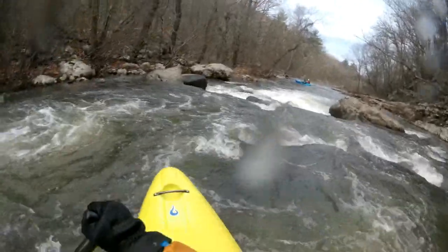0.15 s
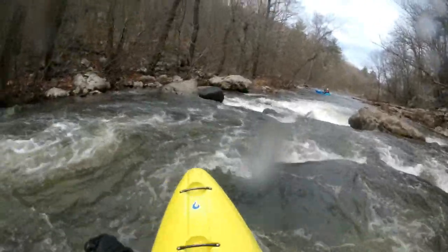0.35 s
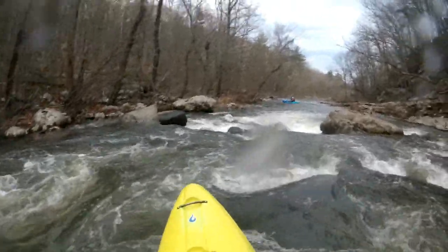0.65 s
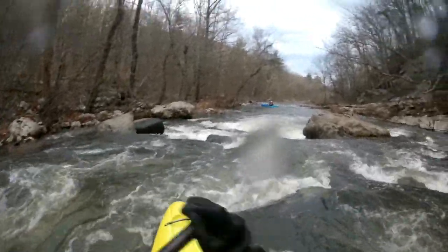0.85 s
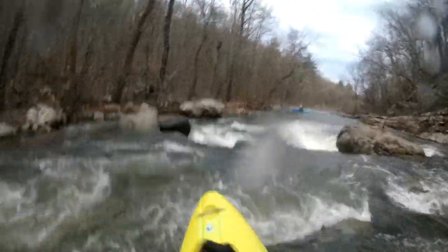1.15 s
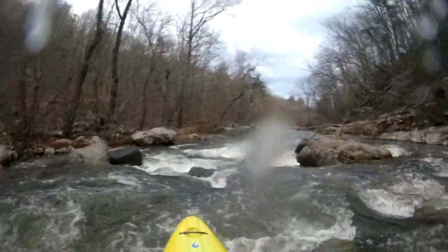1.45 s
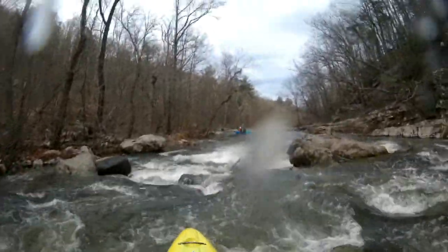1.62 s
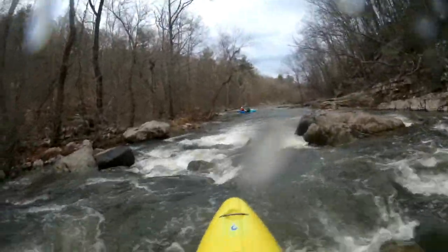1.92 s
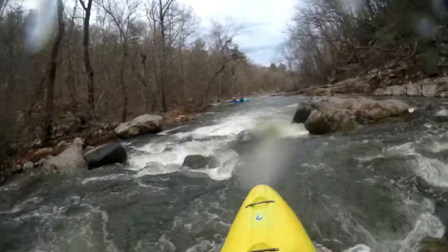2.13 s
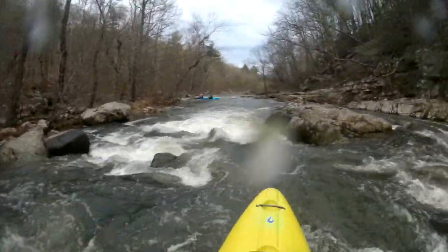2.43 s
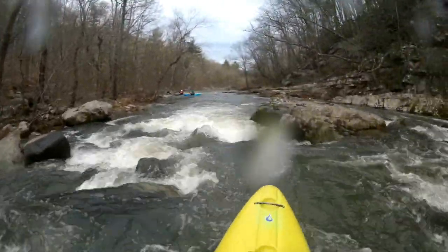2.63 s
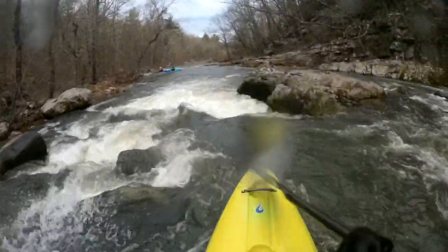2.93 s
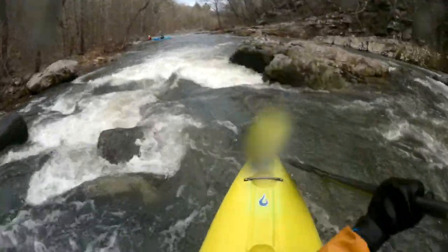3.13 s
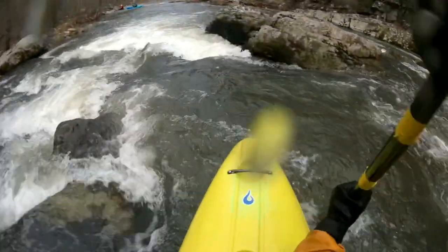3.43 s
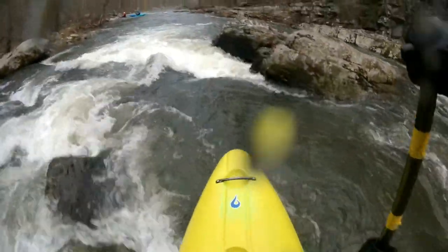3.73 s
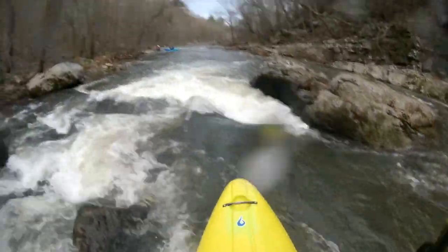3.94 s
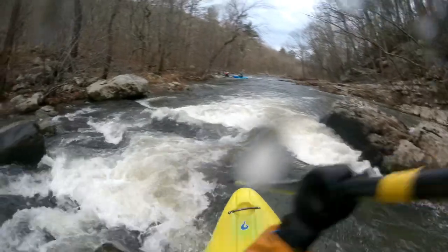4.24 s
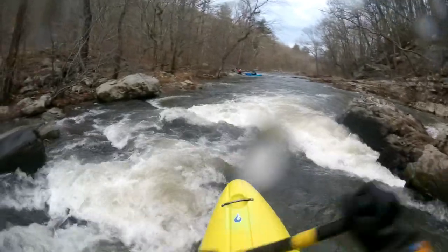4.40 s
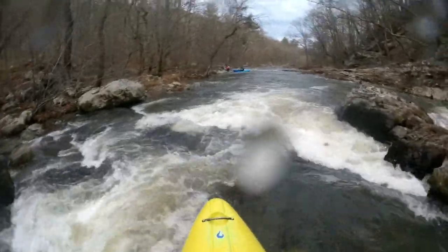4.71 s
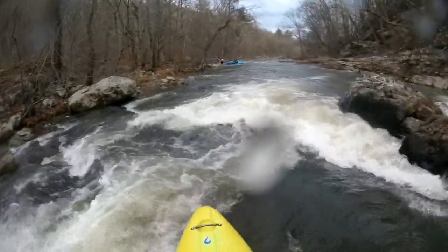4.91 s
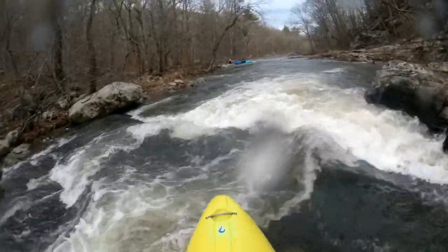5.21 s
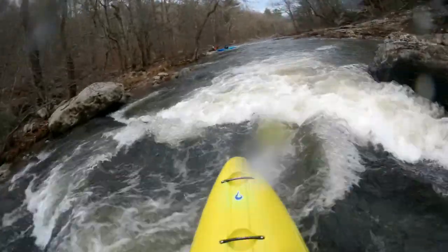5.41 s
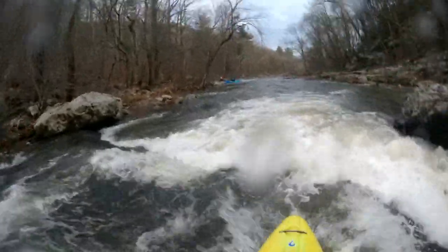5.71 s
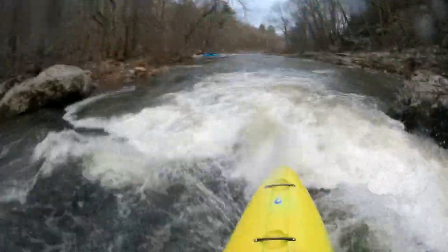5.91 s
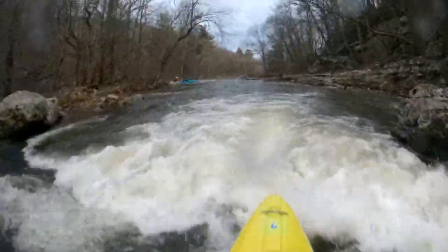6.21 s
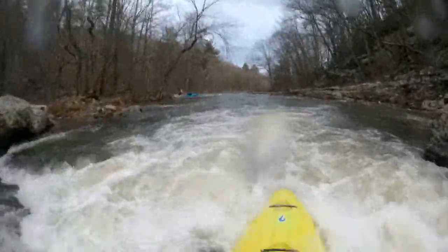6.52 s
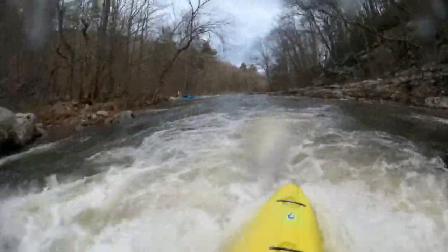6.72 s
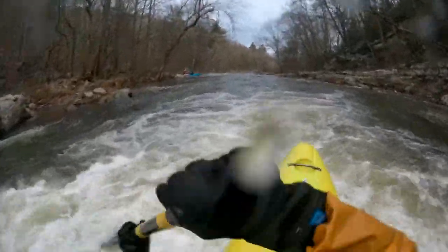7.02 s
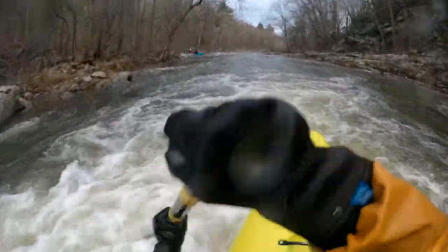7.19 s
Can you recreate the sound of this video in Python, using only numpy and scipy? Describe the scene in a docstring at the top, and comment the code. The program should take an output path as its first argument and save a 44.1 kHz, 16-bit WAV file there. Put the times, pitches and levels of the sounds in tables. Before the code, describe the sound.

Whitewater rushes and fizzes around a kayak, with spray ticking on the microphone, low wind buffeting and a paddle knock.

```python
"""A kayak runs a rocky rapid, heard from a waterproof camera worn by the paddler. Whitewater roars and fizzes
throughout; waves drive air against the microphone, the hull thumps and water gulps. Spray drops tick on the
resonant housing, thickest at 1-2 s. At 3 s the paddle knocks the hull; at 4 s a small pour-over slides past.
Wet slaps follow near 4.5 and 6 s, with more spray, as the rapid swells to its peak at 6.5 s and then recedes."""
import sys
import numpy as np
from scipy import signal
from scipy.fft import rfft, irfft, next_fast_len
from scipy.io import wavfile
from scipy.ndimage import uniform_filter1d, map_coordinates

SR = 44100
rng = np.random.default_rng(int(sys.argv[2]) if len(sys.argv) > 2 else 0)


def bounce(signal):
    """Save signal as a 16-bit WAV file at the path given by the first command-line argument."""
    frames = np.transpose(np.atleast_2d(signal))
    limited = np.clip(frames, -1, 1)
    pcm = np.round(limited * 32767).astype(np.int16)
    wavfile.write(sys.argv[1], SR, pcm)


N = 324135

# waves under the boat: (time [s], hold [s], strength [dB])
WAVE_EVENTS = [(.26, .1, -10), (.62, .06, -12), (1.039, .29, -1), (1.656, .2, -8), (3.043, .2, -14),
               (4.52, 0.16, -12), (5.814, .22, -8), (6.29, .22, -6), (6.9, .13, -13)]
# whitewater loudness contour: (time [s], level [dB])
RAPID_CONTOUR = [(0, -62), (.85, -64), (2.1, -63), (3.9, -59), (4.3, -59), (4.65, -57), (5.3, -58.5),
                 (6.45, -53), (6.95, -54.5), (7.35, -60.5)]
# hiss from froth right around the boat: (time [s], power share [0-1])
FROTH_SHARE = [(0, 0.68), (3.5, 0.03), (5.2, 0.75), (6.5, 0.76), (7.35, 0.97)]

# noise spectra: (frequency [Hz], relative density [dB])
AIR_SPECTRUM = [(1, 11.5), (5, 8), (11, 13.5), (20, 3.5), (30, -4.5), (45, -9), (65, -21.5), (130, -36),
                (400, -48), (1500, -100)]  # air on the microphone
POUR_SPECTRUM = [(5500, -25), (7200, -6), (8400, 1), (9300, -4), (10600, -1.5), (11800, -13), (16000, -24)]  # pour-over fizz
ROAR_SPECTRUM = [(600, -31), (900, -18.5), (1020, -6), (1110, -1.5), (1200, 1), (1300, -3.5), (1430, -8.5),
                 (1600, -6), (1700, -9), (1830, -8), (2050, -13.5), (2500, -21), (3100, -31.5), (4500, -45)]  # bubble clouds
FOAM_SPECTRUM = [(2200, -30), (2950, -11.5), (3400, -2.5), (3750, -3), (4000, 1), (4350, -3), (4900, -9),
                 (5800, -10), (6500, -17.5), (9000, -29.5)]  # foam ahead, at the housing's resonance
FROTH_SPECTRUM = [(2200, -21), (2950, -9.5), (3550, 0.5), (4300, -2), (4900, -2.5), (6000, -5.5),
                  (6700, -14), (9000, -31)]  # broader hiss all around
MIST_SPECTRUM = [(5000, -30), (6500, -2), (7700, -0.5), (8500, 1), (9300, -2), (10400, -3), (12000, -8),
                 (13700, -9), (15400, -17), (16500, -12)]  # finest spray
CHURN_SPECTRUM = [(35, -13), (44, 2.5), (62, 0.5), (78, 4.5), (92, 5.5), (112, 0.5), (200, -2), (300, -3),
                  (600, -4), (850, -4), (1200, -17), (2500, -50)]  # deep water motion
SMACK_SPECTRUM = [(100, -13), (400, -0.5), (900, -1.5), (2000, -1), (2700, -10), (3500, 3), (5000, -0.5),
                  (9000, -27)]  # drop contact
SPATTER_SPECTRUM = [(1500, -28), (2700, -14), (3500, -0.5), (5500, 5), (7000, -1.5), (9500, -2.5),
                    (11000, -4), (11900, -8.5), (12600, -10), (13800, -23), (15200, -14), (17000, -20)]  # drop fragments
SPLASH_SPECTRUM = [(800, -18), (1700, 7), (2300, 4), (2900, -4.5), (4200, 2.5), (6500, -11.5),
                   (10500, -12.5), (15000, -34)]  # larger mass of water breaking

# damped modes: (frequency [Hz], level [dB], t60 [s])
SHELL_MODES = [(1200, -29, 0.037), (1540, -18.5, 0.023), (1860, -33, 0.019), (3480, -9.5, 0.0045),
               (4044, -0.5, 0.0078), (4494, -6, 0.0074), (6030, -22, 0.011)]  # housing under a drop
KNOCK_MODES = [(734, -12.5, 0.033), (1165, -13.5, 0.048), (1330, 0, 0.018), (1450, -0.5, .015),
               (1820, 2.5, .016), (2220, -17, 0.0092)]  # housing under a blow to the boat
HULL_MODES = [(170, -4.5, 0.085), (219, 1, 0.053), (384, -8, 0.055)]  # hollow hull

# low rings, hull thumps (near 1.0, 3.2 and 5.9 s) and air pockets closing: (time [s], level [dB], start pitch
# [Hz], t60 [s])
LOW_RINGS = [(.69, -37.5, 99, 0.23), (1.0, -26.5, 51.6, 0.2), (3.078, -41, 504, 0.13),
             (3.2, -34.5, 90.5, 0.31), (5.901, -30, 51.5, .25), (6.467, -18.5, 1140, 0.028),
             (6.474, -26.5, 1290, 0.053)]
# spray sheets on the housing: (time [s], level [dB], rise [s])
SPRAY_SHEETS = [(1.064, -46, 0.0028), (1.106, -48, 0.0011), (1.129, -39, 0.0022), (1.1886, -47, 0.0023),
                (1.402, -41, 0.0025), (1.742, -52, 0.0024), (3.324, -54.5, 0.005), (5.742, -53, 0.0035),
                (5.976, -47.5, 0.0027), (6.322, -44.5, 0.0032), (6.593, -49.5, 0.0032),
                (6.918, -53.5, .003)]
# drops on the housing: (time [s], impact [dB], spatter [dB])
DROP_HITS = [(0.2806, -33.5, -51), (0.3673, -22.5, -52), (0.47, -41, -53), (0.6094, -25, -40.5),
             (1.074, -25, -31), (1.0992, -21.5, -42), (1.1341, -11.5, -39), (1.189, -28, -41),
             (1.264, -17, -38), (1.3329, -12.5, -38), (1.3717, -25, -66), (1.4101, -21.5, -34),
             (1.5517, -29.5, -53), (1.6505, -22, -49), (1.6923, -24.5, -59), (1.7759, -26, -53),
             (1.843, -38, -48), (1.8628, -35.5, -54), (1.976, -52, -55), (2.6634, -36.5, -59),
             (4.0844, -25, -57), (4.2271, -27, -54), (4.663, -26.5, -47), (4.6964, -30, -39),
             (4.7012, -23, -30), (4.7633, -28, -45), (5.7757, -35, -63), (5.828, -27.5, -56),
             (6.0104, -32, -47), (6.0945, -20, -29), (6.18, -33, -46), (6.219, -27, -60),
             (6.2931, -27.5, -51), (6.3793, -17, -45), (6.429, -29.5, -42), (6.701, -33, -53),
             (7.006, -27.5, -45)]
# paddle and wave blows: (time [s], level [dB], boom offset [dB], splash offset [dB])
BOAT_BLOWS = [(3.0099, -11, -13, -29), (3.0161, -25.5, -21, -39), (3.070, -31, -10, -33),
              (4.5435, -25, -30, -1.5), (4.55, -24.5, -34, -17), (5.977, -32, -2, -17),
              (6.012, -26.5, -16, -11.5)]


def amp(db):
    """Decibels to amplitude."""
    return 10 ** (np.asarray(db) / 20)


def unit(x):
    """Scale to rms 1."""
    return x / np.sqrt(np.mean(x ** 2) + 1e-20)


def gain_at(spectrum, hz):
    """Spectrum amplitude, interpolated over log frequency."""
    knots_hz, db = np.transpose(spectrum)
    return amp(np.interp(np.log(hz + 1e-3), np.log(knots_hz), db))


def curve(points):
    """(time [s], value) points to one value per sample."""
    return np.interp(np.arange(N) / SR, *np.transpose(points))


def wobble(rate_hz):
    """Smooth random curve with knots at rate_hz."""
    knots = rng.standard_normal(int(N * rate_hz / SR) + 4)
    return map_coordinates(knots, [np.arange(N) * rate_hz / SR])


def filtered(x, response):
    """Apply a gain given as a function of frequency."""
    size = next_fast_len(N + SR // 2)
    return irfft(rfft(x, size) * response(np.fft.rfftfreq(size, 1 / SR)), size)[:N]


def impulse(spectrum, size=2048):
    """Minimum-phase click of energy 1 with this spectrum."""
    cepstrum = irfft(np.log(gain_at(spectrum, np.fft.rfftfreq(size, 1 / SR))))
    cepstrum[1:size // 2] *= 2
    cepstrum[size // 2 + 1:] = 0
    click = irfft(np.exp(rfft(cepstrum)))
    return click / np.linalg.norm(click)


def add(track, at_s, sound):
    """Mix a sound into the track."""
    part = track[round(at_s * SR):][:len(sound)]
    part += sound[:len(part)]


def ring(modes, t, scatter_db, detune):
    """Damped modes, varied per strike."""
    draws = rng.standard_normal((len(modes), 2))
    return sum(amp(db + scatter_db * level_draw - 60 * t / t60_s)
               * np.sin(2 * np.pi * hz * (1 + detune * pitch_draw) * t)
               for (hz, db, t60_s), (level_draw, pitch_draw) in zip(modes, draws))


def rush(spectrum, patchy_db, pops=0, pops_per_s=300):
    """Patchy noise of rms 1; pops weights single bursting bubbles."""
    bins = signal.stft(rng.standard_normal(N), nperseg=512)[2]
    patches = uniform_filter1d(rng.standard_normal(bins.shape), size=5, axis=0)
    patches = uniform_filter1d(patches, size=10, axis=1)
    wash = signal.istft(bins * amp(patchy_db * unit(patches)), nperseg=512)[1][:N]
    bursts = (rng.random(N) < pops_per_s / SR) * rng.standard_normal(N)
    return unit(filtered(unit(wash) + pops * unit(bursts), lambda hz: gain_at(spectrum, hz)))


def wave_force(attack_s=0.06, release_s=0.076):
    """Each wave builds, holds and lets go of the boat."""
    t = np.arange(N) / SR
    force = np.zeros(N)
    for at_s, hold_s, db in WAVE_EVENTS:
        before_s, after_s = np.maximum(at_s - t, 0), np.maximum(t - at_s - hold_s, 0)
        force += amp(db) * np.exp(-before_s / attack_s - after_s / release_s)
    return force


def buffeting(breeze_db=-39.5, wave_db=-23):
    """Air pushes on the microphone in deep lumps, hardest when a wave throws the boat."""
    return np.hypot(amp(breeze_db), amp(wave_db) * wave_force()) * rush(AIR_SPECTRUM, patchy_db=1.0)


def pour_over(closest_s=4, pass_s=0.5, closest_db=-70.5):
    """Fine spray of a passing pour-over, falling as 1 / distance."""
    distance = np.hypot(1, (np.arange(N) / SR - closest_s) / pass_s)
    level = amp(closest_db + 0.8 * wobble(6.9)) / distance
    return level * rush(POUR_SPECTRUM, patchy_db=0, pops=0.25, pops_per_s=550)


def whitewater():
    """Bubble clouds roar, foam hisses, mist fizzes; all follow the rapid. Waves stir roar and churn."""
    rapid_db = curve(RAPID_CONTOUR)
    rise_db = rapid_db - rapid_db.mean()
    froth_share = curve(FROTH_SHARE)
    swell, force = wobble(9), wave_force()

    roar_level = np.hypot(amp(-47 + 0.64 * rise_db), amp(-50) * force) * amp(0.5 * swell)
    roar = roar_level * rush(ROAR_SPECTRUM, patchy_db=1.34, pops=0.32, pops_per_s=250)

    foam = np.sqrt(1 - froth_share) * rush(FOAM_SPECTRUM, patchy_db=2.3, pops=0.17, pops_per_s=400)
    froth = np.sqrt(froth_share) * rush(FROTH_SPECTRUM, patchy_db=2.5, pops=0.32, pops_per_s=400)
    hiss = amp(-59.5 + 1.01 * rise_db + 0.44 * swell) * (foam + froth)

    mist_level = amp(-70.5 + 1.1 * rise_db + 0.56 * swell)
    mist = mist_level * rush(MIST_SPECTRUM, patchy_db=2.5, pops=0.3, pops_per_s=600)

    churn_level = np.hypot(amp(-53.5 + 0.64 * rise_db), amp(-49) * force) * amp(0.81 * wobble(12))
    churn = churn_level * rush(CHURN_SPECTRUM, patchy_db=1.5)
    return roar + hiss + mist + churn


def thumps_and_gulps():
    """Hull thumps and trapped air pockets ring with a soft start and slightly rising pitch."""
    out, t = np.zeros(N), np.arange(SR // 3) / SR
    for at_s, db, hz, t60_s in LOW_RINGS:
        cycles = hz * t * (1 + 0.043 * t / t60_s)
        envelope = amp(db - 60 * t / t60_s) * (1 - np.exp(-cycles))
        add(out, at_s, envelope * np.sin(2 * np.pi * cycles))
    return out


def sprays():
    """Sheets of droplets crest on the housing within milliseconds, then drain."""
    out, t = np.zeros(N), np.arange(SR // 10) / SR
    spatter_ir, splash_ir = impulse(SPATTER_SPECTRUM), impulse(SPLASH_SPECTRUM)
    for at_s, db, rise_s in SPRAY_SHEETS:
        envelope = t / rise_s * np.exp(1 - t / rise_s)
        fine, coarse = rng.laplace(size=(2, len(t))) * envelope
        add(out, at_s, amp(db - 4.5) * signal.fftconvolve(fine, spatter_ir))
        add(out, at_s, amp(db) * signal.fftconvolve(coarse, splash_ir))
    return out


def stray_drops(count=7, flight_s=0.46, impact_db=-47, spatter_db=-53.5, spread_db=2):
    """Faint drops thrown up by the waves; rows as in DROP_HITS."""
    thrown = np.cumsum(wave_force())
    quantiles = (np.arange(count) + rng.random(count)) / count
    launch_s = np.searchsorted(thrown / thrown[-1], quantiles) / SR
    size_db = spread_db * rng.standard_normal(count)
    return [(at_s + flight_s, impact_db + db, spatter_db + db) for at_s, db in zip(launch_s, size_db)]


def drops(flatten_s=0.00041, contact_t60_s=0.0089, burst_t60_s=0.0053, clump_t60_s=0.028):
    """Each drop smacks and rings the housing, then bursts; fragments land in clumps."""
    out, t = np.zeros(N), np.arange(SR // 20) / SR
    smack_ir, spatter_ir = impulse(SMACK_SPECTRUM), impulse(SPATTER_SPECTRUM)
    for at_s, impact_db, spatter_db in DROP_HITS + stray_drops():
        onset = 1 - np.exp(-(t / flatten_s) ** 2)
        shell = ring(SHELL_MODES, t, scatter_db=0, detune=0.029) * onset
        contact = rng.standard_normal(len(t)) * amp(-60 * t / contact_t60_s)
        flutter = unit(uniform_filter1d(rng.standard_normal(len(t)), size=64))
        clumps = amp(7.4 * np.minimum(flutter, 1.8) - 13 - 60 * t / clump_t60_s)
        spatter = rng.standard_normal(len(t)) * (amp(-60 * t / burst_t60_s) + clumps)
        add(out, at_s + 0.001106, amp(impact_db + 5.5) * shell)
        add(out, at_s + 0.001108, amp(impact_db - 8.5) * signal.fftconvolve(contact, smack_ir))
        add(out, at_s + 0.0009, amp(spatter_db + 4.5) * signal.fftconvolve(spatter, spatter_ir))
    return out


def blows(attack_s=0.00058, splash_t60_s=0.048):
    """Paddle and waves strike the boat: the housing knocks, the hull booms, water splashes."""
    out, t = np.zeros(N), np.arange(SR // 5) / SR
    splash_ir = impulse(SPLASH_SPECTRUM)
    for at_s, db, boom_db, splash_db in BOAT_BLOWS:
        knock = ring(KNOCK_MODES, t, scatter_db=0.1, detune=0.0024) * (1 - np.exp(-t / attack_s))
        boom = ring(HULL_MODES, t, scatter_db=1, detune=0.0095)
        burst = rng.standard_normal(len(t)) * amp(-60 * t / splash_t60_s)
        splash = signal.fftconvolve(burst, splash_ir)[:len(t)]
        add(out, at_s, amp(db) * (amp(-4) * knock + amp(boom_db - 6.5) * boom + amp(splash_db) * splash))
    return out


def scene():
    """Mono sum at the microphone."""
    return (whitewater() + pour_over() + buffeting() + drops() + sprays() + blows() + thumps_and_gulps())[None]


def record(dry):
    """The camera's band limit."""
    cutoff_hz = 15850
    return filtered(dry[0], lambda hz: hz < cutoff_hz)[None]


dry = scene()
out = record(dry)
bounce(out)
```